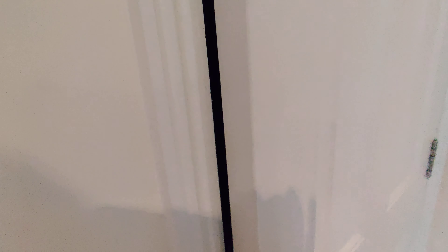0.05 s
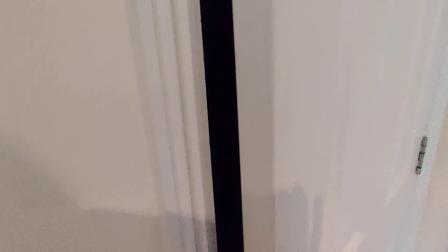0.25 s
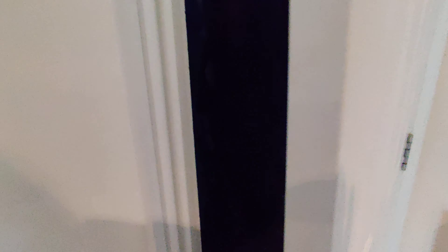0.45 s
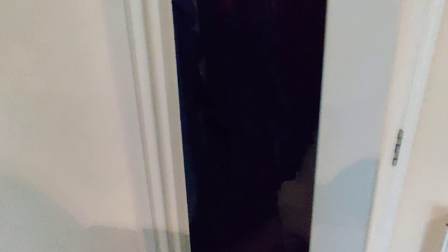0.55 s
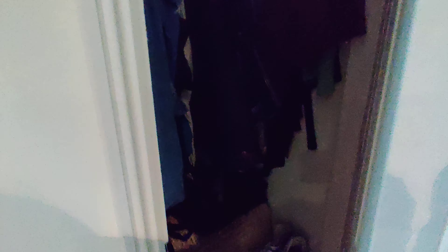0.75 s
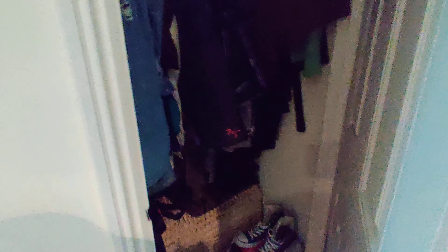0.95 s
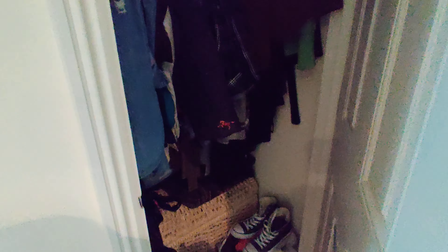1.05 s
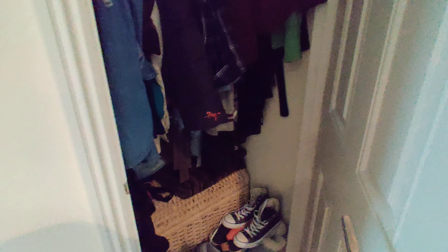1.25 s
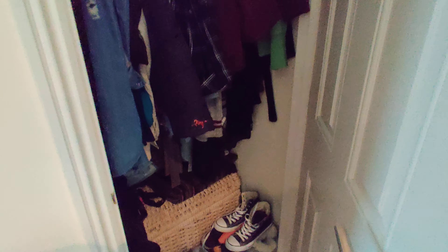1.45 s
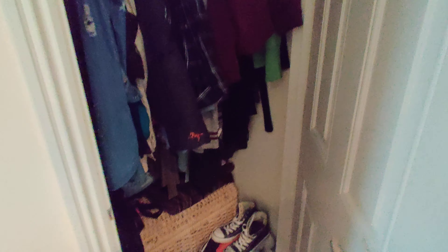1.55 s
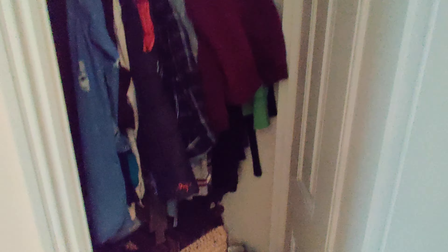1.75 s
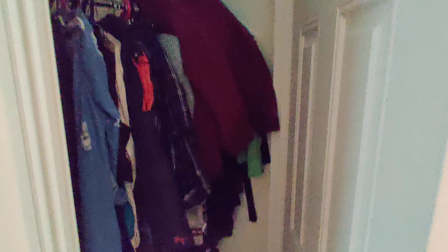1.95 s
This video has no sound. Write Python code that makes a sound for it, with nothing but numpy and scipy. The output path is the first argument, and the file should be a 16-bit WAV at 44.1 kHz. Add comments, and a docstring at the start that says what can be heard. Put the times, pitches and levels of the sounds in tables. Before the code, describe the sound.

Close to the microphone in a quiet bedroom, a wooden closet door comes free with a ringing thump and a latch knock. A soft brush over carpet and faint cloth rustling follow, then one soft footstep.

```python
"""A small, quiet bedroom, with a stereo microphone close to a wooden closet door.
Clothes stir, and the door, pulled, bumps in its frame. At 0.3 s it pops free with a low thump that
rings the wood and the room; then its latch knocks. Its lower edge brushes over the carpet until
about 0.9 s. Cloth rustles faintly over the room's rumble and hiss, and near 1.9 s a foot slides
and thuds softly on the floorboards."""
import sys
import numpy as np
from scipy import signal
from scipy.io import wavfile
from scipy.ndimage import uniform_filter1d

SR = 44100
rng = np.random.default_rng(int(sys.argv[2]) if len(sys.argv) > 2 else 0)


def transcribe(u):
    """Save the signal u as a 16-bit wav file named by the first command-line argument.

    u: samples, shape (n,) or (channels, n), limited to [-1, 1]; the rate is SR.
    q: integer samples, one column per channel.
    """
    v = np.clip(np.atleast_2d(u).T, -1, 1)
    q = np.round(v * 32767).astype(np.int16)
    wavfile.write(sys.argv[1], SR, q)


N = 88200
TIME = np.arange(N) / SR


# The pop as the door comes free. Each row: start in seconds, level in dB, contact brightness in Hz.
DOOR_BLOWS = [(.316, 0, 5940)]
# The leaf's modes. Each row: pitch in Hz, level in dB, t60 in seconds, left minus right in dB.
DOOR_MODES = [(113, -27.5, .3, 2), (150, -32, 0.47, 5), (182.6, -37.5, 0.64, -2),
              (238.3, -21.5, 0.25, -0.5), (250.8, -22.5, 0.27, 1), (284, -29.5, 0.23, 9),
              (322, -27, 0.33, 2), (342, -30, .2, -4), (426, -25, 0.17, 11), (498.5, -18.5, 0.25, 4),
              (579, -24, 0.073, 0), (693, -23.5, 0.112, -14.5), (740, -24.5, 0.081, -2),
              (836.5, -22, 0.13, -3), (926, -20.5, .11, -7.5), (1020.5, -26, 0.044, 14),
              (1099, -23.5, 0.059, -10), (1130, -30.5, 0.059, -14), (1223, -44, 0.086, -6.5),
              (1330, -32, .09, -4), (2080, -47, .12, -12), (4710, -44.5, 0.092, -6)]
# Its crowd of weaker resonances. Each row: frequency in Hz, relative level in dB.
DOOR_CLATTER = [(100, -4.5), (200, -5.5), (350, -3), (700, -4.5), (1150, -8), (1600, -15.5), (2500, -20.5),
                (4700, -40), (7000, -24.5), (14000, -44)]

def door_pop():
    """Close to the microphone, the door pops free and its whole leaf rings."""
    return struck(DOOR_BLOWS, DOOR_MODES, DOOR_CLATTER, clatter_db=-25, t60_s=.12, tail_db=-13)


# The latch's knock. Each row: start in seconds, level in dB, contact brightness in Hz.
LATCH_BLOWS = [(.4545, 3.5, 8300)]
# Its modes. Each row: pitch in Hz, level in dB, t60 in seconds, left minus right in dB.
LATCH_MODES = [(285, -41.5, 0.32, 3), (385, -33, 0.13, 4), (415.4, -36.5, .15, -10),
               (721, -26.5, 0.065, 0.5), (790, -28.5, 0.068, -4), (880, -27.5, 0.06, -3),
               (1084, -36.5, 0.046, -13), (1983, -45, 0.051, -16), (2350, -50.5, 0.1, -13),
               (2540, -50.5, 0.18, -13), (4700, -53.5, 0.14, -6)]
# Its weaker resonances. Each row: frequency in Hz, relative level in dB.
LATCH_CLATTER = [(100, 0), (400, 1.5), (850, -1), (1400, -15.5), (2400, -14.5), (3600, -18), (5500, -31),
                 (12000, -40)]

def latch_knock():
    """One hard contact rings the latch, its high modes to the right of the microphone."""
    return struck(LATCH_BLOWS, LATCH_MODES, LATCH_CLATTER, clatter_db=-36.5, t60_s=.15, tail_db=-20)


# Bumps in the frame, the last a soft scrape just before the pop. Each row: start in seconds, level in dB,
# contact brightness in Hz.
FRAME_BLOWS = [(.1595, -3.5, 3500), (.213, 1.5, 890), (.249, -1, 900), (.3075, -4, 2500)]
# The frame's modes. Each row: pitch in Hz, level in dB, t60 in seconds, left minus right in dB.
FRAME_MODES = [(107, -39, .25, 10), (168, -56, 0.22, 0), (227.6, -44.5, 0.75, 1), (286.5, -40, 0.22, 1),
               (359, -46, 0.16, 2), (423, -50, 0.48, 2), (736, -44, 0.11, -4)]
# Its weaker resonances. Each row: frequency in Hz, relative level in dB.
FRAME_CLATTER = [(100, -6), (300, -9.5), (500, -9), (900, -7), (1300, -25), (4000, -32)]

def frame_bumps():
    """The door strains and bumps dully against its frame, then scrapes softly just before it gives."""
    return struck(FRAME_BLOWS, FRAME_MODES, FRAME_CLATTER, clatter_db=-44.5, t60_s=.06, tail_db=-9)


# Wood snapping on wood. Each row: start in seconds, level in dB, pitch in Hz, t60 in seconds.
SNAPS = [(0.1606, -44, 900, 0.011), (.2165, -40, 740, 0.027), (0.3148, -16.5, 408, 0.0076),
         (0.3208, -18.5, 1000, 0.013), (0.3284, -18.5, 580, 0.015), (0.4592, -19.5, 723, 0.015),
         (1.835, -40, 275, 0.018), (1.851, -35.5, 273, 0.018), (1.8642, -29.5, 714, 0.0036)]

def wood_snaps():
    """Wood catches on wood in dry snaps, dead centre, each gone within a few cycles."""
    return sum(from_db(db) * np.sin(-2 * np.pi * hz * since(s)) * decay(since(s), t60_s)
               for s, db, hz, t60_s in SNAPS)


# Flexing panels. Each row: start in seconds, peak in dB, pitch in Hz, time to the peak in seconds.
BOOMS = [(.14, -38, 61.9, 0.055), (0.197, -28, 61, 0.026), (0.251, -32.5, 60.5, 0.013),
         (0.324, -21.5, 60.2, 0.039), (.482, -29.5, 57.4, 0.022), (1.883, -41.5, 40.6, 0.0094),
         (1.946, -36.5, 58.7, .028)]
ROOM_HZ, ROOM_DB, ROOM_RISE_S, ROOM_T60_S = 80.5, -22, .02, .66   # the bedroom's bass resonance

def panel_booms():
    """Door and floor flex and push the air in slow cycles; after the pop the room hums on."""
    out = np.zeros(N)
    for s, db, hz, peak_s in BOOMS:
        age = since(s) / peak_s
        envelope = (age * np.exp(1 - age)) ** 2
        out += from_db(db) * envelope * np.sin(2 * np.pi * hz * since(s))
    for s, db, _ in DOOR_BLOWS:
        envelope = fade(since(s), ROOM_RISE_S, ROOM_T60_S)
        out += from_db(db + ROOM_DB) * envelope * np.sin(2 * np.pi * ROOM_HZ * since(s))
    return out


# A foot settling. Each row: start in seconds, level in dB, contact brightness in Hz.
STEP_BLOWS = [(1.862, -14, 1500), (1.9065, 2, 2000)]
# The floorboards' modes. Each row: pitch in Hz, level in dB, t60 in seconds, left minus right in dB.
FLOOR_MODES = [(239.6, -31, 0.12, 1), (304, -54, 0.23, -1), (437, -48.5, 0.46, 4), (525, -42, 0.076, 20),
               (619, -44, .1, -2), (652, -36.5, 0.09, -2), (752, -43, 0.096, -4), (916, -34.5, .05, 0)]
# Their weaker resonances, then the slide's colour. Each row: frequency in Hz, relative level in dB.
FLOOR_CLATTER = [(100, 5.5), (180, -8), (280, 8.5), (800, -1), (1300, -19), (2500, -13), (6000, -38)]
SLIDE_COLOUR = [(200, -23), (550, -0.5), (800, 4.5), (1200, 4.5), (1500, 3), (2300, -23), (4000, -22)]

def footfall():
    """Down at floor level a foot slides, then thuds on the boards."""
    slide = from_db(-57) * swell(middle_s=1.814, half_s=.092) * noise(SLIDE_COLOUR)
    thud = struck(STEP_BLOWS, FLOOR_MODES, FLOOR_CLATTER, clatter_db=-41.5, t60_s=.25, tail_db=-19)
    return slide + thud


# The brushing over the swing. Each row: time in seconds, level in dB.
BRUSH_LEVEL = [(0, -63), (.13, -56.5), (.22, -54), (.33, -49), (.5, -49.5), (.65, -47.5), (.79, -48),
               (.83, -52), (.88, -58.5), (.95, -77)]
# Its colour. Each row: frequency in Hz, relative level in dB.
BRUSH_COLOUR = [(200, 6.5), (400, 6), (800, 2), (1400, -3), (2100, -1), (2900, -1.5), (4000, -3.5),
                (5000, -4.5), (6200, -6), (7700, -6.5), (9500, -7), (12500, -4), (15000, 0)]
# Narrow resonances, perhaps the microphone's, that colour the hiss.
# Each row: centre in Hz, width in Hz, gain of the added band in dB.
PEAKS_ON_BRUSH = [(2020, 270, 0.5), (4990, 430, -2), (8070, 460, -9)]

def carpet_brush():
    """The door's lower edge drags over the carpet with a fine hiss that follows the swing."""
    return gain_curve(BRUSH_LEVEL) * resonate(noise(BRUSH_COLOUR), PEAKS_ON_BRUSH)


# Rustles. Each row: middle and half-length in seconds, level in dB, tilt in dB per octave.
RUSTLES = [(0.067, 0.078, -60, -1), (1.039, 0.075, -55.5, -0.05), (1.167, 0.073, -58.5, 0.1),
           (1.391, 0.086, -59.5, -0.3), (1.409, 0.0032, -57, 0.5), (1.78, 0.075, -59, 0.4),
           (1.968, 0.12, -60, 1.5)]
# The cloth's colour. Each row: frequency in Hz, relative level in dB.
CLOTH_COLOUR = [(200, 2.5), (500, -0.5), (1100, -3), (1500, -1.5), (2200, -3), (3200, -2), (5000, -2.5),
                (7000, -4.5), (10000, -5.5), (15000, -5.5)]
# A narrow resonance, perhaps the microphone's, that colours the rustle.
# Each row: centre in Hz, width in Hz, gain of the added band in dB.
PEAKS_ON_RUSTLE = [(2140, 390, 1)]
CLOTH_GRAIN_DB, CLOTH_GRAIN_PER_S = 0.6, 50

def clothes():
    """Cloth slides over cloth in slightly grainy swells, faint at the microphone."""
    grain = rms_one(uniform_filter1d(rng.standard_normal(N), int(SR / CLOTH_GRAIN_PER_S)))
    swells = np.array([from_db(db) * swell(s, half_s) for s, half_s, db, _ in RUSTLES])
    tilts = np.array(RUSTLES)[:, -1]
    rustle = 0
    for hz, band in zip(*noise_bands(CLOTH_COLOUR)):
        octaves = np.log2(max(hz, 500) / 3000)   # the tilt pivots at 3 kHz and is flat below 500 Hz
        envelope = from_db(tilts * octaves) @ swells
        rustle += band * lean(hz) * envelope
    return resonate(rustle, PEAKS_ON_RUSTLE) * from_db(CLOTH_GRAIN_DB * grain)


# The rumble's rise and fall. Each row: time in seconds, level in dB.
RUMBLE_LEVEL = [(0, -55), (.3, -45.5), (.7, -52), (1.0, -58.5), (1.6, -58), (2.0, -50.5)]
# The colours of rumble and hiss. Each row: frequency in Hz, relative level in dB.
RUMBLE_COLOUR = [(20, 3.5), (45, -4.5), (80, -9.5), (150, -19.5), (400, -32.5), (1500, -52)]
HISS_COLOUR = [(100, 4.5), (300, 6), (700, 4), (1500, 2), (3000, 1), (6000, -3), (10000, -6), (15000, -2)]

def room_tone():
    """All around the microphone, a low rumble swells and sinks under a steady, faint hiss."""
    rumble = gain_curve(RUMBLE_LEVEL) * noise(RUMBLE_COLOUR)
    hiss = from_db(-62.5) * noise(HISS_COLOUR)
    return rumble + hiss


BUILD_CYCLES, CLATTER_RISE_S = 2.8, 0.001   # resonances take a moment to build
SPREAD_S = 0.00018   # each mode reaches the microphone's two sides this far apart
TAIL_T60_S = 0.51   # the bedroom's reverberation

def struck(blows, modes, clatter, clatter_db, t60_s, tail_db):
    """Blows ring a body's modes, its clatter (t60_s at 1 kHz) and the room (tail_db re the clatter)."""
    response = 0
    for k, (hz, db, ring_s, side_db) in enumerate(modes):
        arrival = TIME + (-1) ** k * SPREAD_S * np.array([[.5], [-.5]])
        envelope = fade(TIME, BUILD_CYCLES / hz, ring_s)
        response += from_db(db) * pan(side_db) * envelope * np.sin(2 * np.pi * hz * arrival)
    room_tail = from_db(tail_db) * fade(TIME, CLATTER_RISE_S, TAIL_T60_S)
    for hz, band in zip(*noise_bands(clatter)):
        ring = fade(TIME, CLATTER_RISE_S, t60_s * (1000 / hz) ** .41)   # lows last longer
        response += from_db(clatter_db) * lean(hz) * band * (ring + room_tail)
    force = np.zeros(N)
    for s, db, hz in blows:
        impulse = from_db(db) * signal.unit_impulse(N, int(s * SR))
        softness = signal.butter(2, hz, fs=SR, output="sos")
        force += signal.sosfilt(softness, impulse + 1e-18)
    return signal.fftconvolve(response, force[None], axes=1)[:, :N]


# Diffuse sound at the microphone. Each row: frequency in Hz, left-right likeness from 0 to 1.
LIKENESS = [(60, 0.6), (150, 0.64), (300, 0.88), (600, 0.34), (1100, 0.081), (2200, 0.074), (12000, 0)]

def noise_bands(colour):
    """Third-octave bands of stereo noise, together of rms 1; returns centres in Hz and bands."""
    edges = np.geomspace(18, 17000, 31)
    centres = np.sqrt(edges[1:] * edges[:-1])
    white = rng.standard_normal((2, 2, N + SR // 4))
    bands = []
    for k, hz in enumerate(centres):
        bandpass = signal.butter(2, edges[k:k + 2], "band", fs=SR, output="sos")
        mid, side = signal.sosfilt(bandpass, white[k % 2])[:, -N:]
        alike = at_hz(LIKENESS, hz)
        stereo = np.sqrt(1 + alike) * mid + np.sqrt(1 - alike) * side * [[1], [-1]]
        bands.append(from_db(at_hz(colour, hz)) * stereo)
    bands = np.array(bands)
    return centres, bands / bands.sum(axis=0).std()


# The balance of diffuse sound. Each row: frequency in Hz, left minus right in dB.
LEAN = [(100, -0.5), (500, 2.5), (1000, 2), (2200, -3), (4500, 2.5), (8000, -2), (13000, 2)]

def lean(hz):
    """Left and right gains of a diffuse band at the microphone."""
    return pan(at_hz(LEAN, hz))


def noise(colour):
    """Steady coloured stereo noise."""
    return sum(band * lean(hz) for hz, band in zip(*noise_bands(colour)))


def resonate(x, peaks):
    """Add narrow resonances to a sound."""
    return x + sum(from_db(db) * signal.lfilter(*signal.iirpeak(hz, hz / width, fs=SR), x)
                   for hz, width, db in peaks)


def from_db(db):
    """Decibels to gain."""
    return 10 ** (np.asarray(db) / 20)


def rms_one(x):
    """Scale to unit rms."""
    return x / np.sqrt(np.mean(x ** 2) + 1e-20)


def at_hz(points, hz):
    """Read a table on a log-frequency axis."""
    freqs, values = np.transpose(points)
    return np.interp(np.log(hz), np.log(freqs), values)


def gain_curve(points):
    """Gain over time from rows of seconds and dB."""
    return from_db(np.interp(TIME, *np.transpose(points)))


def pan(db):
    """Left and right gains for a level difference."""
    return from_db(np.array([[db], [-db]]) / 2)


def since(s):
    """Seconds since a moment, zero before it."""
    return np.maximum(TIME - s, 0)


def decay(t, t60_s):
    """A fall of 60 dB every t60_s."""
    return np.exp(-np.log(1000) * t / t60_s)


def fade(t, rise_s, t60_s):
    """A quick rise and an exponential decay."""
    return (1 - np.exp(-t / rise_s)) * decay(t, t60_s)


def swell(middle_s, half_s):
    """A bell-shaped rise and fall."""
    return np.exp(-.5 * ((TIME - middle_s) / half_s) ** 2)


def scene():
    """Door, carpet, clothes and footfall over the still bedroom."""
    still = room_tone()
    door = frame_bumps() + door_pop() + latch_knock()
    return door + wood_snaps() + panel_booms() + carpet_brush() + clothes() + footfall() + still


CUTOFF_HZ = 15680

def record(dry):
    """The microphone's signal is cut steeply at the top of the treble."""
    return signal.sosfilt(signal.ellip(12, .2, 80, CUTOFF_HZ, fs=SR, output="sos"), dry)


dry = scene()
out = record(dry)
transcribe(out)
```